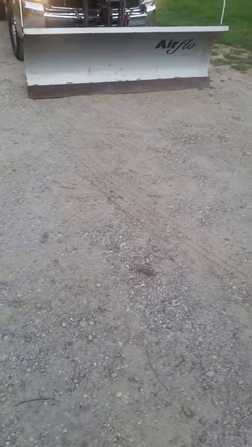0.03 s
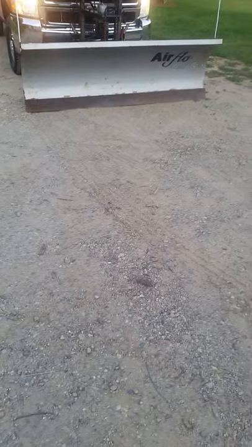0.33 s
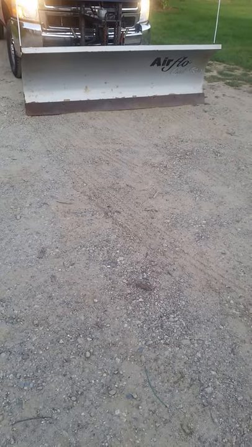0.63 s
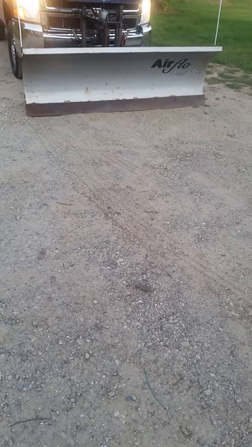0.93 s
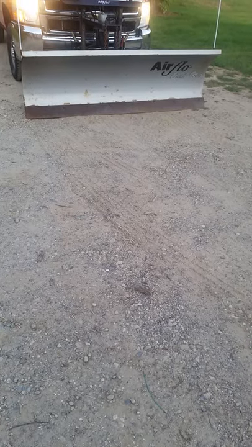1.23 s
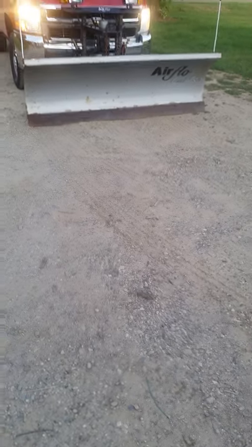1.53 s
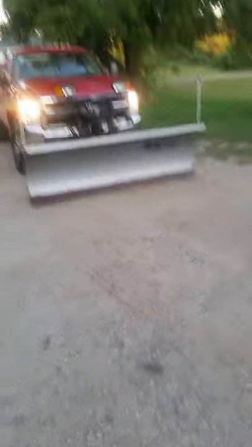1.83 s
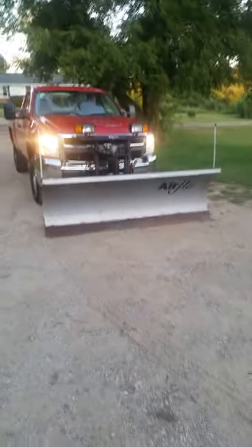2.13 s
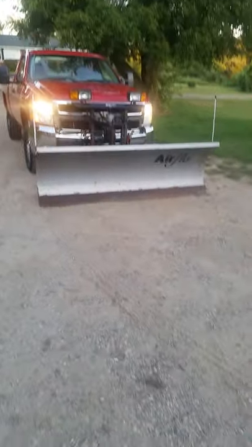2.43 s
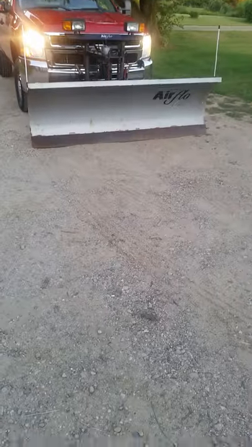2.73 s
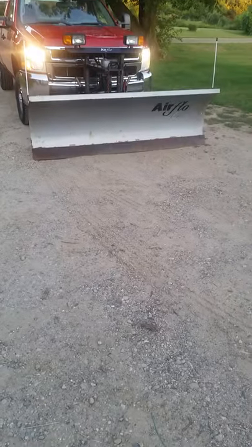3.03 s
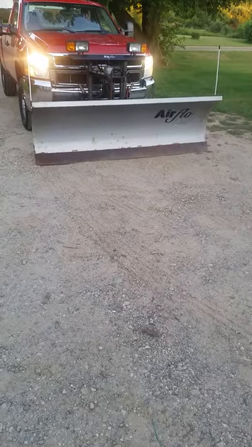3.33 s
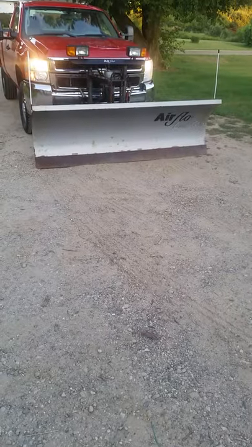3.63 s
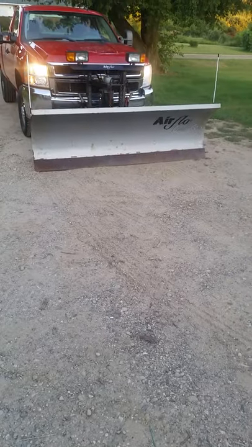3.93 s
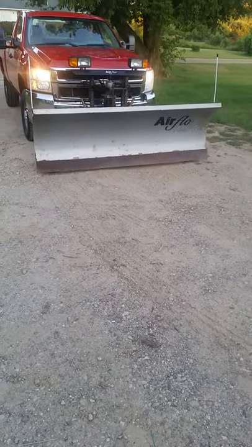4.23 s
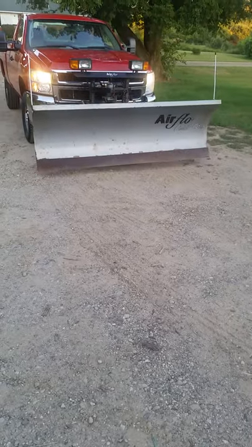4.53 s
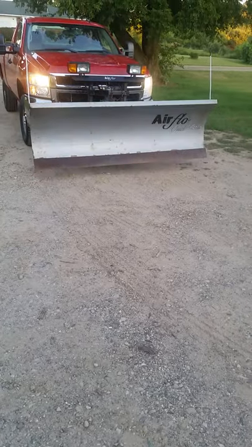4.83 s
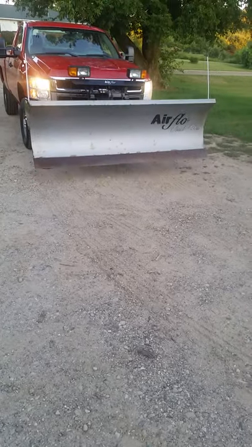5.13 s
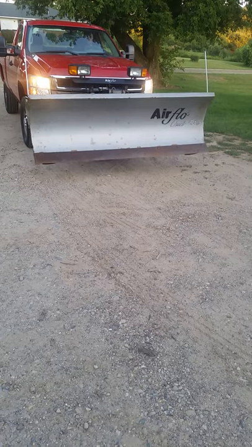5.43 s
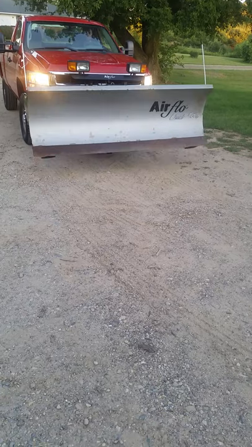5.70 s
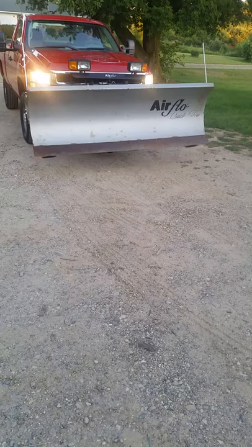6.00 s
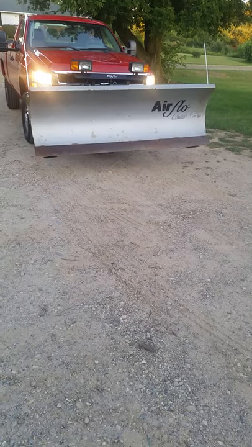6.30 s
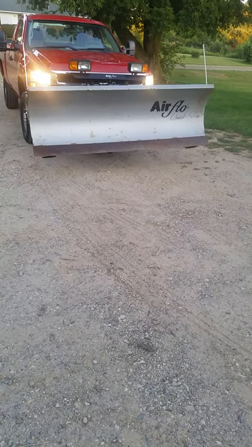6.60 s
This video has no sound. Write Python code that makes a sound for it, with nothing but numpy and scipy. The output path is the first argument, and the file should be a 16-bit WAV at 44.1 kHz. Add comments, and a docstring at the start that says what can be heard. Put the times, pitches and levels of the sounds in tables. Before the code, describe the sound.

At about 0.4 seconds a pickup truck's idling engine fades in, a low, puffing rumble with a light hiss, heard outdoors from a few metres away. Faint, high trills come and go in the distance throughout. Around 1.7 seconds a finger brushes the microphone with a few dry ticks and small thuds. A very faint, thin squeak follows near 3 seconds. At 3.6 seconds a switch snaps and an electric pump begins a soft, hissing whir, with a short, low groan just after. The steel plow blade lifts with sharp, ringing clanks from 4 to 4.3 seconds and again around 4.7, each with a slight echo. The whine sags in pitch and weakens under the load. Another quick cluster of clanks comes at about 5.6 seconds, and the pump stops at 5.8. The engine keeps idling until the end, near 6.8 seconds.

```python
"""Pickup lifting a snow plow

A V8 pickup idles on a gravel drive, its cylinders puffing into the exhaust pipe. A relay snaps and
an electric oil pump whirs, sagging in pitch as it lifts the steel plow. The linkage jerks tight and
clanks through the blade. Faint trills, a thin squeak and a short, low groan are heard too.
The hand-held microphone, a few metres in front, fades in and is brushed once by a finger."""
import sys
import numpy as np
from scipy import signal
from scipy.fft import rfft, irfft, next_fast_len
from scipy.io import wavfile
from scipy.ndimage import map_coordinates

SR = 44100
rng = np.random.default_rng(int(sys.argv[2]) if len(sys.argv) > 2 else 0)


def waveform_to_disk(signal):
    """Save audio, clipped to [-1, 1], as 16-bit WAV at the path in sys.argv[1]."""
    frames = np.transpose(np.atleast_2d(signal))
    scaled = np.clip(frames, -1, 1) * 32767
    samples = np.round(scaled).astype(np.int16)
    wavfile.write(sys.argv[1], SR, samples)


N = 298116

# strength of the exhaust puffs, and of the airy hiss around the truck: (time [s], level [dB])
IDLE_LEVEL = [(.6, -40.5), (1.6, -36.5), (2.35, -34), (3.0, -37.5), (3.6, -33.5), (5.3, -38.5),
              (5.85, -31.5), (6.76, -40)]
HISS_LEVEL = [(.6, -49), (1.6, -46), (1.8, -49), (6.7, -52)]
# exhaust tones: (frequency [multiple of the crank speed], level [dB])
EXHAUST_TONES = [(3.5, -61), (4, -53.5), (5, -70), (7, -44.5), (7.5, -52), (9, -47), (9.5, -53),
                 (10, -45.5), (12.5, -55.5), (14, -49.5), (17.5, -58.5)]
# the tone colour of each noise: (frequency [Hz], relative level [dB])
PIPE_COLOUR = [(13, -47), (22, -18), (49, -23), (69, -3.5), (87, 1.5), (119, -4.5), (141, -8.5), (195, -8),
               (217, -10), (247, -12.5), (342, -24), (390, -33.5), (500, -33.5), (650, -52), (1100, -120)]
ENGINE_BAY_COLOUR = [(180, -57), (300, 0), (393, -5), (416, -6.5), (595, -3.5), (642, -4), (857, -2.5),
                     (935, -9.5), (1350, -12), (1730, -19), (2200, -22), (3000, -26), (3900, -25),
                     (6600, -120)]
HISS_COLOUR = [(1290, -13.5), (2200, -2), (2970, -7), (3580, -3.5), (4350, -3.5), (4830, -1.5), (5690, -3),
               (7020, 0), (8740, -4), (9630, -10), (15300, -7)]
RELAY_COLOUR = [(150, -2), (700, -2.5), (2600, -18), (4200, -2), (6000, -7.5), (9000, -5), (15000, 0.5)]
OIL_COLOUR = [(1470, -45), (2500, -29), (2760, -18), (3850, -7), (4120, -14.5), (4800, -4.5), (6160, -8),
              (7560, 1), (7910, -5), (8860, -6.5), (13500, -13), (15300, -8)]
FRAME_COLOUR = [(120, -5), (330, 7), (600, 0), (1250, -5), (2200, -29), (3200, -42)]
BLADE_COLOUR = [(53, -38), (90, -14), (136, -1), (278, -7), (353, -12.5), (467, -14), (839, -10.5),
                (1830, -18.5), (2230, -11), (2650, -20), (7490, -10.5), (9110, -16.5), (16000, -18)]
# distant trills: (start [s], end [s], top pitch [Hz], level [dB])
TRILLS = [(.76, 1.65, 6930, -49), (1.85, 2.47, 6930, -53), (3.3, 3.57, 6720, -50), (4.5, 5.5, 6930, -50),
          (6.56, 6.75, 6720, -50)]
# finger ticks on the case: (time [s], relative level [dB], dull above [Hz], thud level [dB])
FINGER_TICKS = [(1.689, -17, 1490, -35), (1.6946, -11, 5000, -24), (1.701, -18, 4000, -16),
                (1.7045, -16, 8000, -8.5), (1.7447, -23, 5000, -50), (1.793, -26.5, 500, -13.5)]
# the fingertip rubs between ticks: (middle [s], width [s], level [dB])
FINGER_RUBS = [(1.701, 0.015, -39), (1.785, 0.015, -41.5)]
# sliding tones: (start [s], length [s], first pitch [Hz], last pitch [Hz], arch [Hz], level [dB])
SQUEAK_SLIDE = (2.7, .52, 9000, 10600, 2700, -59)
GROAN_SLIDE = (3.765, .1, 245, 195, 10, -33)
# the motor's relay snaps shut, then drops out: (time [s], level [dB])
RELAY_SNAPS = [(3.586, -21), (5.826, -42.5)]
# resonances of the pump housing: (frequency [Hz], width [Hz], relative level [dB])
HOUSING_PEAKS = [(440, 180, -8), (900, 1030, -9), (4700, 680, -15), (7640, 300, -15), (7680, 590, -0.5),
                 (8150, 350, -14.5), (9500, 400, -15), (15600, 440, -6)]
# blows in the linkage: (time [s], strength [dB], weight [dB], hardness [dB], rise time [s])
BLOWS = [(3.731, -32.5, -7, -26, 0.0017), (3.965, -21, -0.5, -5, 0.028), (4.01, -21, 7, -3.5, 0.0041),
         (4.11, -20.5, -9, 3.5, 0.00082), (4.257, -28.5, 4, -29, 0.0023), (4.528, -39, 7, -42, 0.0016),
         (4.668, -18.5, -3, -2, 0.0025), (4.782, -23, 1, -14.5, 0.0011), (5.622, -17, -10, 3.5, 0.0026),
         (5.642, -23.5, -2.5, -1, 0.002), (5.684, -32.5, -5, 8, 0.0089), (5.815, -35.5, 8.5, -16, .0058)]
# weight acts on the low-middle range, hardness on the treble: (frequency [Hz], share [0-1])
WEIGHT_SHARE = [(130, .15), (230, .35), (350, 1), (480, .8), (750, 0)]
HARDNESS_SHARE = [(1500, 0), (4000, 1)]
# ringing notes of blade and frame: (frequency [Hz], relative level [dB], time to fade 60 dB [s])
STEEL_NOTES = [(135.6, 3, 0.26), (224.3, -7.5, 0.35), (323, -7, 0.6), (347.7, -2, 0.49), (392, -5, 0.45),
               (516, -8, .3), (588.5, -9.5, 0.83), (738, -4.5, 0.21), (804, -4, 0.22), (857, -16, 1),
               (1000, -18, 0.63), (1208, -9.5, 0.36), (1332, -5.5, 0.27), (1680, -12, 0.13),
               (2054, -3, 0.16), (2263, -5, 0.2), (3860, -10, 0.14), (4170, -12, .1), (4480, -8.5, 0.14),
               (4890, -8, 0.16), (6073, -15, 0.2), (8000, -4.5, 0.12)]
# dense ring of the sheet steel, and the yard's echo: (frequency [Hz], time to fade 60 dB [s])
SHEET_DECAY = [(150, 0.47), (700, 0.52), (2000, 0.27), (5000, 0.1), (9000, 0.074), (15000, 0.078)]
YARD_DECAY = [(150, 1), (1000, 0.49), (4000, 0.77), (12000, 0.51)]
# balance of the microphone's two openings: (frequency [Hz], left minus right [dB])
MIC_BALANCE = [(60, -3.5), (110, -3), (200, -7), (380, -6), (700, 0), (1290, -6), (2380, -3), (4400, -6.5),
               (8120, -2), (15000, -1.5)]
# how alike left and right are: (frequency [Hz], likeness [0-1])
STEREO_LIKENESS = [(30, 0.23), (80, 0.93), (170, 1), (350, 0.48), (800, 0.94), (2000, 0.27), (12000, 0.082)]

PUMP_ON_S, LOAD_S, PUMP_OFF_S = 3.6, 4.11, 5.83  # at LOAD_S the pump takes the blade's weight
SPIN_UP_S, TAKE_UP_S, COAST_S = 0.063, 0.041, 0.036  # how quickly it starts, takes the load, stops
FREE_HZ, SAG_HZ_PER_S = 491.3, 34  # gear pitch running free, and its fall under load
WHINE_DB, WHINE_TOP_DB_PER_S = -48, -9  # gear whine, and the fade of its top harmonic under load
# level running free, step on taking the load, and steady fade after that
OIL_DB, OIL_STEP_DB, OIL_DB_PER_S = -41.5, -4.5, -4.5
RUMBLE_DB, RUMBLE_STEP_DB, RUMBLE_DB_PER_S = -47, 6, -4


def amp(db):
    """Turn decibels into a gain."""
    return 10 ** (np.asarray(db) / 20)


def unit(x, first=None):
    """Scale x to an average (rms) level of 1, judged on all of it or on its first samples."""
    return x / np.sqrt(np.mean(x[..., :first] ** 2) + 1e-20)


def along(points, hz):
    """Read a (frequency, value) table at hz, on a log scale of frequency."""
    freqs, values = np.transpose(points)
    return np.interp(np.log(hz + 1), np.log(freqs + 1), values)


def curve(points):
    """Join (time, value) points with straight lines, one value per sample."""
    return np.interp(since(0), *np.transpose(points))


def since(s):
    """Seconds gone by after time s, 0 before it."""
    return np.maximum(np.arange(N) / SR - s, 0)


def wobble(rate):
    """A smooth curve through rate random points a second."""
    return map_coordinates(rng.standard_normal(int(N * rate / SR) + 4), [since(0) * rate])


def filtered(x, response):
    """Multiply each frequency in x by response(hz)."""
    n = x.shape[-1]
    padded = next_fast_len(n + 8192)
    return irfft(rfft(x, padded) * response(np.fft.rfftfreq(padded, 1 / SR)), padded)[..., :n]


def add(track, s, sound):
    """Mix a sound into a track at time s."""
    part = track[..., round(s * SR):][..., :sound.shape[-1]]
    part += sound[..., :part.shape[-1]]


def spread(pair):
    """Blend two unrelated signals into left and right, mostly alike in the bass, less in the treble."""
    angle = lambda hz: np.arccos(along(STEREO_LIKENESS, hz)) / 2
    mid, side = filtered(pair, lambda hz: np.array([np.cos(angle(hz)), np.sin(angle(hz))]))
    return np.array([mid + side, mid - side])


def rush(colour, pulse=1):
    """Stereo noise at level 1, shaped by an optional pulse and then coloured."""
    noise = pulse * rng.standard_normal((2, N))
    return unit(spread(filtered(noise, lambda hz: amp(along(colour, hz)))))


def dying_noise(decay):
    """Two one-second noises in which each frequency dies away at its own speed."""
    hz, t, spectrum = signal.stft(rng.standard_normal((2, SR)), SR, nperseg=256)
    fade = amp(-60 * t / along(decay, hz)[:, None])
    return signal.istft(spectrum * fade, SR, nperseg=256)[1][:, :SR]


def engine(crank_hz=11.62, drift=0.00512, uneven_db=3, waver_db=3.5, bay_db=-47, bay_follows=0.59):
    """Eight unequal cylinders puff into the pipe, four a turn; the engine bay rustles in step."""
    turns = np.cumsum(crank_hz * (1 + drift * wobble(2.976))) / SR
    firings = 4 * turns
    cylinders = amp(uneven_db * unit(rng.standard_normal(8)))
    stroke = cylinders[firings.astype(int) % 8] * np.sin(np.pi * firings) ** 2 - .5
    tones = 0
    for multiple, db in EXHAUST_TONES:
        peak = np.sqrt(2) * amp(db + waver_db * wobble(8.4))
        tones += peak * np.sin(2 * np.pi * (multiple * turns + rng.random()))
    idle_db = curve(IDLE_LEVEL)
    puffs = amp(idle_db) * rush(PIPE_COLOUR, pulse=1 + 0.61 * stroke)
    bay_gain = amp(bay_db + bay_follows * (idle_db - idle_db.mean()))
    rustle = bay_gain * rush(ENGINE_BAY_COLOUR, pulse=1 + 0.099 * stroke)
    hiss = amp(curve(HISS_LEVEL) + 0.3 * np.sin(2 * np.pi * turns)) * rush(HISS_COLOUR)
    return tones + puffs + rustle + hiss


def trills(chirp_s=.028, period_s=.073, arch=0.07, scatter_db=2):
    """Something small in the trees repeats a faint chirp that arches up and down in pitch."""
    chirps = np.zeros(N)
    position = np.linspace(-1, 1, round(chirp_s * SR))
    swell = np.cos(np.pi * position / 2) ** 2
    for start, end, hz, db in TRILLS:
        phase = 2 * np.pi * np.cumsum(hz * (1 - arch * position ** 2)) / SR
        for s in np.arange(start, end, period_s):
            add(chirps, s, amp(db + scatter_db * rng.standard_normal()) * swell * np.sin(phase))
    return chirps


def finger(tick_boost_db=2, slip_s=0.0015, case_hz=300, case_ring_s=0.0072):
    """A fingertip rubs and slips on the microphone's case in dry ticks, each with a small thud."""
    ticks = np.zeros((2, N))
    t = np.arange(SR // 20) / SR
    thud = np.sin(2 * np.pi * case_hz * t) * amp(-60 * t / case_ring_s)
    for s, db, dull_hz, thud_db in FINGER_TICKS:
        slip = spread(rng.standard_normal((2, len(t))) * np.exp(-t / slip_s))
        tick = filtered(slip, lambda hz: 1 / (1 + 1j * hz / dull_hz) / (1 + 1j * hz / dull_hz / 4))
        add(ticks, s, amp(db + tick_boost_db) * tick / np.abs(tick).max() + amp(thud_db) * thud)
    pressure = sum(amp(db) * np.exp(-((since(0) - s) / width) ** 2) for s, width, db in FINGER_RUBS)
    return ticks + pressure * rush(HISS_COLOUR)


def sliding_tone(slide, wander, jitter, waver_db):
    """An unsteady tone swells and fades while its pitch slides along an arch."""
    start, length, first_hz, last_hz, arch_hz, db = slide
    progress = np.minimum(since(start) / length, 1)
    swell = np.sin(np.pi * progress)
    hz = first_hz + (last_hz - first_hz) * progress + arch_hz * swell
    hz *= 1 + wander * wobble(18) + jitter * wobble(120)
    gain = np.sqrt(np.abs(swell)) * amp(db + waver_db * wobble(36))
    return gain * np.sin(2 * np.pi * np.cumsum(hz) / SR)


def squeak():
    """A thin, faint squeak wavers high in the treble."""
    return sliding_tone(SQUEAK_SLIDE, wander=.03, jitter=.011, waver_db=4)


def relay(rise_s=0.0011, hold_s=0.012, fade_s=0.082):
    """The contacts of the motor's switch slam, chatter for a moment and die away in a bright snap."""
    envelope = 0
    for s, db in RELAY_SNAPS:
        attack = 1 - np.exp(-since(s) / rise_s)
        envelope += attack * amp(db - 60 * since(s + hold_s) / fade_s)
    return envelope * rush(RELAY_COLOUR)


def housing(hz):
    """The pump housing favours the frequencies near its resonances."""
    return sum(amp(db) / (1 + (2 * (hz - centre) / width) ** 2) for centre, width, db in HOUSING_PEAKS)


def pump(flutter=0.00393, waver_db=3, harmonic_limit=38):
    """Gear teeth whine and oil rushes; under load the motor slows and shakes the frame harder."""
    loaded_s = since(LOAD_S)
    load = 1 - np.exp(-loaded_s / TAKE_UP_S)
    running = (1 - np.exp(-since(PUMP_ON_S) / SPIN_UP_S)) * np.exp(-since(PUMP_OFF_S) / COAST_S)
    gear_hz = running * (FREE_HZ - SAG_HZ_PER_S * loaded_s)
    phase = 2 * np.pi * np.cumsum(gear_hz * (1 + flutter * wobble(90))) / SR
    teeth = 0
    for k in range(1, harmonic_limit):
        fade_db = WHINE_TOP_DB_PER_S * loaded_s * (k / harmonic_limit) ** 2
        teeth += amp(fade_db + waver_db * wobble(30)) * np.cos(k * phase + rng.uniform(0, 2 * np.pi))
    whine_gain = amp(WHINE_DB) * np.sqrt(running.mean())  # allows for the time the pump is silent
    whine = whine_gain * unit(filtered(running * teeth, housing))
    oil = amp(OIL_DB + OIL_STEP_DB * load + OIL_DB_PER_S * loaded_s) * rush(OIL_COLOUR)
    rumble = amp(RUMBLE_DB + RUMBLE_STEP_DB * load + RUMBLE_DB_PER_S * loaded_s) * rush(FRAME_COLOUR)
    return whine + running * (oil + rumble)


def clank(weight_db, hardness_db, rise_s, notes_db=-4, scatter_db=3, crack_db=-7, crack_s=0.011):
    """One blow cracks and rings the steel blade; a heavy blow sounds fuller, a hard one brighter."""
    t = np.arange(SR) / SR
    sheet = spread(filtered(dying_noise(SHEET_DECAY), lambda hz: amp(along(BLADE_COLOUR, hz))))
    crack = spread(rng.standard_normal((2, SR))) * amp(-60 * t / crack_s)
    notes = 0
    for hz, db, ring_s in STEEL_NOTES:
        envelope = amp(db + scatter_db * rng.standard_normal((2, 1)) - 60 * t / ring_s)
        notes += envelope * np.sin(2 * np.pi * (hz * t + rng.random()))
    onset = SR // 40  # the three parts are balanced over their first 25 ms
    ring = unit(sheet, onset) + amp(notes_db) * unit(notes, onset) + amp(crack_db) * unit(crack, onset)
    attack = 1 - np.exp(-(t / rise_s) ** 2)

    def contact(hz, dull_hz=9500):
        db = weight_db * along(WEIGHT_SHARE, hz) + hardness_db * along(HARDNESS_SHARE, hz)
        return amp(db) / np.sqrt(1 + (hz / dull_hz) ** 6)
    return attack * filtered(ring, contact)


def linkage(echo_db=-12):
    """Pins and chain jerk tight as the blade rises; trees and truck scatter a weak echo."""
    clanks = np.zeros((2, N))
    for s, db, weight_db, hardness_db, rise_s in BLOWS:
        add(clanks, s, amp(db) * clank(weight_db, hardness_db, rise_s))
    tail = dying_noise(YARD_DECAY)
    echo = signal.fftconvolve(clanks, tail / np.linalg.norm(tail[0]), axes=1)[:, :N]
    return clanks + amp(echo_db) * echo


def groan():
    """A short, low, falling groan just after the pump starts."""
    return sliding_tone(GROAN_SLIDE, wander=0.0049, jitter=0.021, waver_db=-1.0)


def arrival(hz, lead_s=0.0001864, scramble_rad=3.3, treble_hz=6000, ripple_hz=300):
    """Sound reaches the left side first; reflections off ground and truck scramble the treble's phase."""
    ripple = map_coordinates(rng.standard_normal(200), [hz / ripple_hz], mode="mirror")
    phase = 2 * np.pi * hz * lead_s + scramble_rad * np.minimum(hz / treble_hz, 1) * ripple
    return np.exp(.5j * phase * np.array([[1], [-1]]))


def scene():
    """Truck, plow and trees are some metres off; the finger is right at the microphone."""
    lift = relay() + pump() + linkage() + groan()
    distant = lift + squeak() + engine() + trills()
    return filtered(distant, arrival) + finger()


def record(dry, top_hz=16000):
    """The microphone fades in, hears more on the right and passes nothing above top_hz."""
    fade_db = curve([(.35, -160), (.36, -50), (.375, -24), (.42, -12), (.55, -6), (.63, 0)])
    balance = lambda hz: amp(along(MIC_BALANCE, hz) / 2 * np.array([[1], [-1]]))
    return filtered(dry * amp(fade_db), lambda hz: balance(hz) * (hz < top_hz))


dry = scene()
out = record(dry)
waveform_to_disk(out)
```